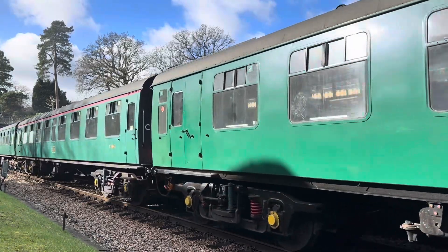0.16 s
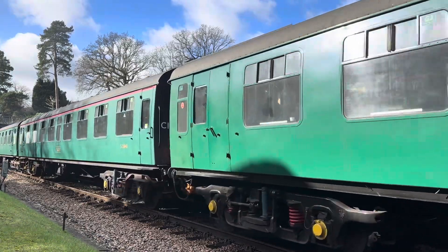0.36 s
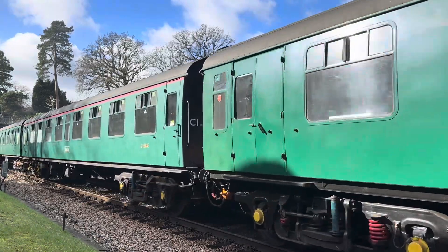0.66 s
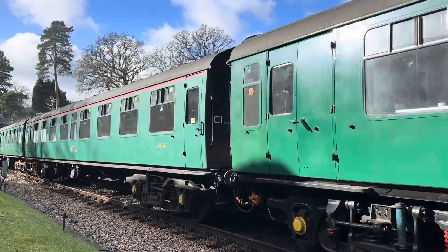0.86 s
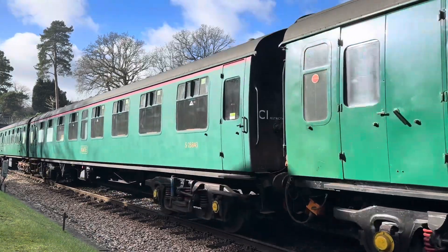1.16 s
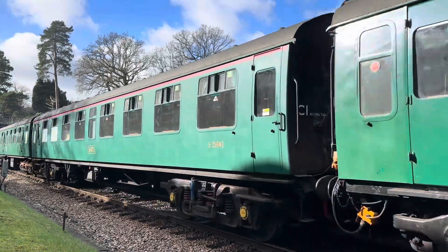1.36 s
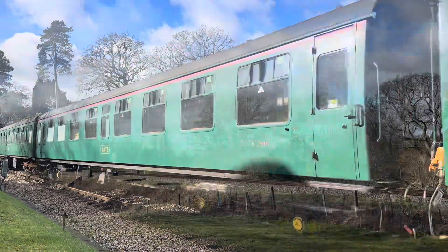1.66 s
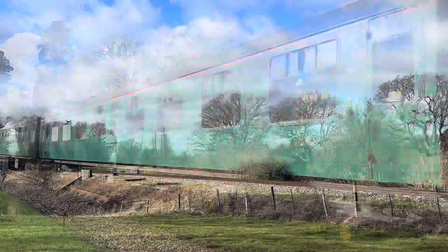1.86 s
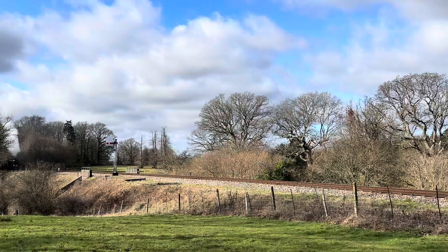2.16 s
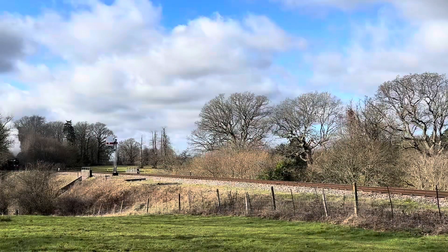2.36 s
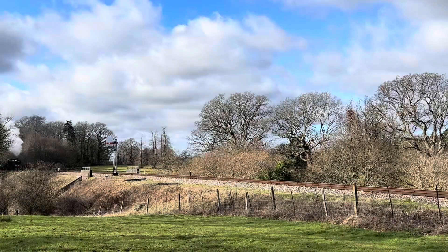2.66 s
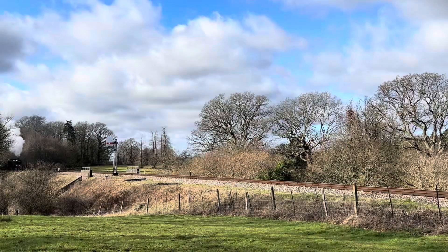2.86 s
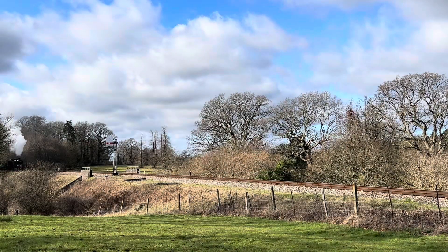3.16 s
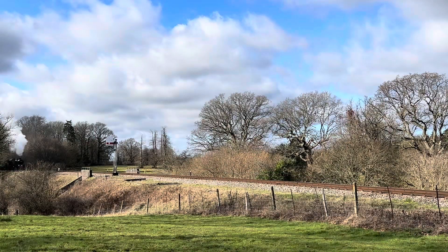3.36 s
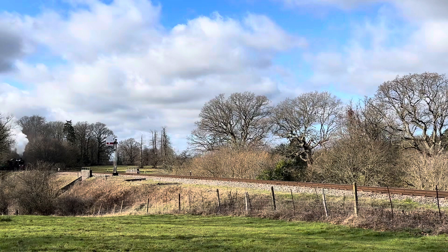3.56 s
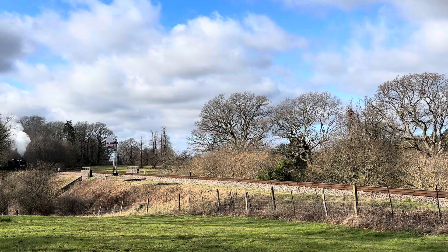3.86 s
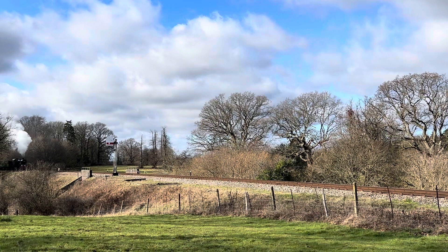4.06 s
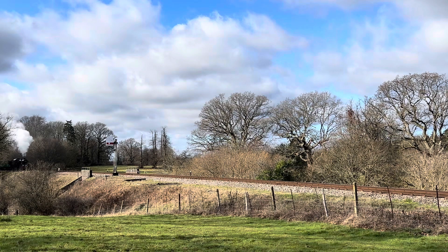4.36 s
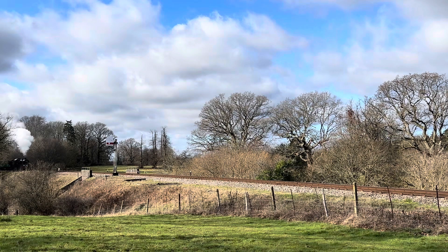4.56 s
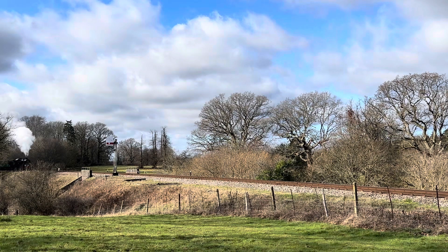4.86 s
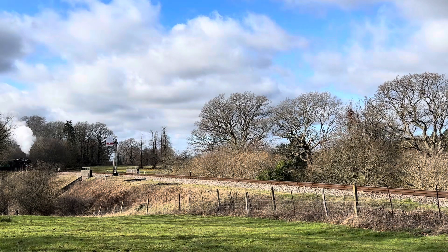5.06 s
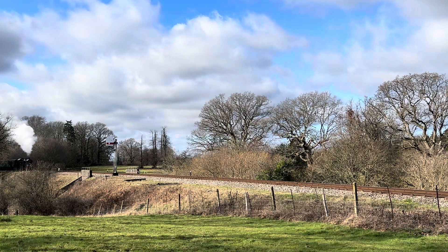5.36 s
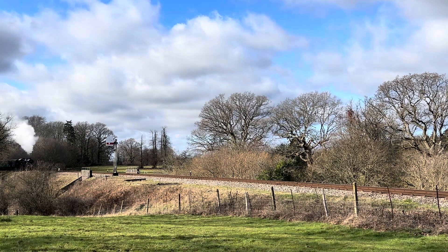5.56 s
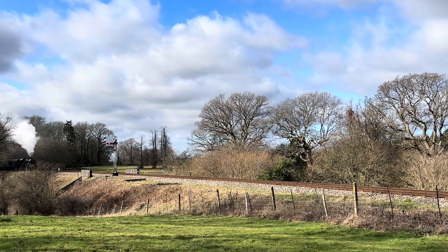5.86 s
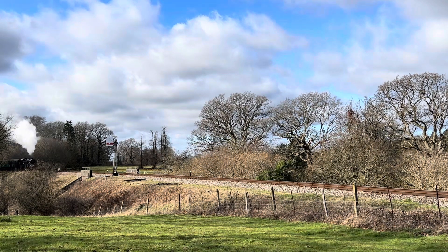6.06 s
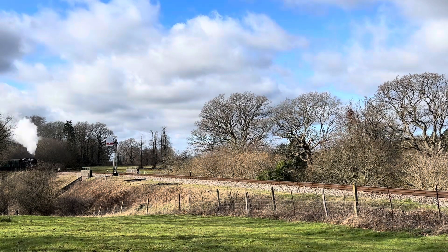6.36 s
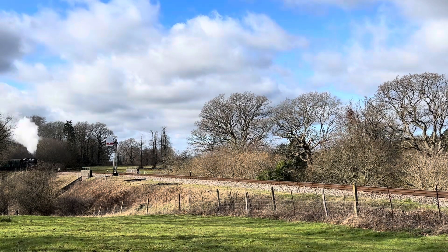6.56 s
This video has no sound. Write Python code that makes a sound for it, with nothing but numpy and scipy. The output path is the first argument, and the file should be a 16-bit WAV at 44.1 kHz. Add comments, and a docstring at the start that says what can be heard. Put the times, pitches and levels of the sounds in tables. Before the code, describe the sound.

Close train carriages roll, clack and hiss, giving way to far-off steam engine chuffs with birdsong and gusts of wind.

```python
"""At first railway coaches roll past close by: rough wheels on rough rail rumble and roar over a hum,
a rubbing wheel hisses and squeals, and wheels clack across a rail joint. From 1.5 s they fade into open
country, leaving the wash of a distant steam locomotive. From 2.2 s its exhaust rasps and booms in the
chimney, about four beats a second and slowly quickening, while small birds whistle in the hedges.
From about 3.5 s gusts of a turbulent breeze buffet the microphone, hardest shortly before 6 s."""
import sys
import numpy as np
from scipy import signal
from scipy.fft import irfft, next_fast_len
from scipy.io import wavfile

SR = 44100
rng = np.random.default_rng(int(sys.argv[2]) if len(sys.argv) > 2 else 0)


def persist_wave(psi):
    """Save psi, clipped to +-1, as 16-bit WAV."""
    counts = np.round(np.clip(psi, -1, 1) * 32767).astype(np.int16)
    wavfile.write(sys.argv[1], SR, np.atleast_2d(counts).T)


N = 295470
T = np.arange(N) / SR
FFT_SIZE = next_fast_len(N, real=True)
HZ = np.maximum(np.arange(FFT_SIZE // 2 + 1) * SR / FFT_SIZE, 1)

# Spectra of the coaches' noises: (frequency [Hz], relative density [dB])
RUMBLE_SPECTRUM = [(20, -37.5), (33, -44), (48, 15), (62, 11.5), (80, 10), (100, 6), (150, -1), (205, 1),
                   (300, 0), (420, -14), (800, -76)]
ROAR_SPECTRUM = [(250, -71), (450, 0.5), (560, 3), (640, 7), (700, 1), (770, 6.5), (880, -1), (1000, 0.5),
                 (1250, -7), (2000, -7)]
RAIL_SPECTRUM = [(800, -4), (1200, 9.5), (1400, 8.5), (1650, 8.5), (2130, 12.5), (2800, 8.5), (4200, 7),
                 (5200, 7), (7500, -4.5), (9300, 4), (11000, -24)]
FLOOR_SPECTRUM = [(110, -16), (160, 6.5), (210, 6.5), (300, -8), (400, -36), (750, -29), (1100, -30)]
CLACK_SPECTRUM = [(60, -4), (200, 3), (320, 17), (480, 18), (850, -3), (1250, 10), (2200, -11), (4000, -21),
                  (10000, -40)]
RUB_SPECTRUM = [(3000, -2.5), (4250, -17.5), (4650, 10), (5500, 8.5), (6250, 9), (6700, 9.5), (7500, 8),
                (8500, 1.5), (11000, -55)]
# Wheels striking the joint, and wheelsets drumming the floor: (time [s], relative level [dB])
JOINT_IMPACTS = [(.255, -34.5), (.551, -34), (.566, -30.5), (.587, -30), (1.139, -32.5), (1.157, -34),
                 (1.174, -32.5)]
WHEELSET_PASSES = [(1.075, -25), (1.17, -32.5), (1.37, -33), (1.57, -26)]
# Modes of a struck wheel and bogie: (frequency [Hz], relative level [dB], 60 dB decay time [s])
STRUCK_MODES = [(400, -0.5, 0.07), (590, -5, 0.049), (776, 1, 0.08), (996, -11, 0.067), (1254, -9, 0.082),
                (1880, -8, 0.031)]
# Squeals of the rubbing wheel: (time [s], frequency [Hz], relative level [dB])
WHEEL_SQUEALS = [(.035, 6760, -36.5), (.105, 5760, -37), (.19, 5900, -42.5), (.325, 5710, -37.5),
                 (.395, 5960, -38.5), (.44, 5250, -41), (.69, 5600, -47), (.805, 5450, -45),
                 (.865, 5880, -46), (.99, 6000, -45.5)]
# Resonances of the rubbing wheel, the smokebox and chimney, and the engine's steady ring:
# (frequency [Hz], half width [Hz], relative level [dB])
RUBBED_MODES = [(5900, 190, -14), (6580, 140, -16), (6970, 220, -9), (7400, 340, -31)]
SMOKEBOX_MODES = [(379, 51, -8), (891, 52, -8), (1094, 76, -12), (1350, 41, -12), (1514, 55, -13),
                  (2070, 730, -22.5)]
ENGINE_MODES = [(840, 185, -19), (1846, 67, -24.5), (3700, 390, -30)]
# Relative strength of the exhaust: (time [s], rasp [dB], bark [dB], boom [dB], boom lag [s])
EXHAUST_STRENGTH = [(2.17, -42, -51.5, -31, .007), (2.45, -42, -48, -33, 0.016),
                    (2.71, -42, -65, -29, .0078), (2.98, -45, -56, -27.5, 0.0044),
                    (3.23, -49, -52, -31.5, 0.022), (3.51, -45.5, -55, -29.5, 0.027),
                    (3.77, -47, -48.5, -31.5, .014), (4.02, -44.5, -51, -40.5, 0.017),
                    (4.27, -45, -47.5, -34, 0.01), (4.54, -44, -52, -33, 0.011),
                    (4.8, -41.5, -49.5, -32.5, 0.0072), (5.05, -43, -50, -34, 0.018),
                    (5.29, -45.5, -44.5, -28.5, .018), (5.55, -43, -49.5, -26, 0.01),
                    (5.81, -43, -53, -30.5, 0.0082), (6.05, -45.5, -55, -27.5, 0.024),
                    (6.28, -48.5, -54, -26, 0.017), (6.55, -43, -46.5, -28, 0.024)]
# Unevenness of the four beats in a turn of the driving wheels: (offset [s])
BEAT_OFFSETS = [-0.0077, 0.0021, 0.0059, 0.0007]
# Spectra of the locomotive's noises: (frequency [Hz], relative density [dB])
RASP_SPECTRUM = [(100, -13), (200, 20), (300, 21), (490, -2.5), (700, 2.5), (900, -8.5), (1450, -11),
                 (2100, -3), (3100, -13), (7000, -20), (9000, -56)]
BARK_SPECTRUM = [(800, -11.5), (1200, 3), (1600, 0), (2100, -4), (2500, -8.5), (3100, -25)]
STEAM_SPECTRUM = [(2000, -24.5), (3400, 17.5), (4800, 17.5), (6800, 19), (8300, -4), (11000, -48)]
WASH_SPECTRUM = [(25, 6), (70, 26.5), (200, 10.5), (330, 3), (520, -8), (700, -7), (870, -7), (1300, -4),
                 (1830, -8), (2300, -12.5), (3100, -18.5), (6900, -21.5), (8500, -35), (15000, -67.5)]
# Steam escaping with some beats, and the course of the engine's wash: (time [s], level [dB])
STEAM_ESCAPES = [(4.03, -63), (4.79, -62), (5.05, -60.5), (5.29, -54.5), (5.545, -58), (6.05, -69)]
WASH_ENVELOPE = [(1.6, -42), (2.0, -41), (6.7, -40)]
# Left-right coherence beside the track and across the fields: (frequency [Hz], correlation [-1 to 1])
NEAR_COHERENCE = [(80, 0.98), (200, .92), (500, 0.57), (750, 0.39), (1100, 0.036), (1500, -0.016),
                  (2000, 0.83), (3300, 0.42), (4800, -0.37), (6000, 0.68), (9000, -0.53), (13000, -0.65)]
FAR_COHERENCE = [(100, 0.93), (400, 0.84), (1150, 0.65), (1550, -0.51), (2000, 0.96), (3100, 0.63),
                 (4500, 1), (9000, 0.15)]
# Lean of the distant sound: (frequency [Hz], left minus right [dB])
FAR_LEAN = [(200, 0), (650, 2.5), (900, 4), (1350, 2.5), (1750, -14.5), (1900, -7.5), (2200, 0),
            (4000, 0.5)]
# Gusts at the microphone: (time [s], half length [s], relative level [dB])
WIND_GUSTS = [(3.628, 0.07, -36.5), (4.015, 0.13, -33), (4.517, 0.3, -40), (4.978, 0.22, -35),
              (5.497, 0.08, -30.5), (5.655, 0.038, -23.5), (5.806, 0.04, -24), (5.957, 0.11, -35),
              (6.45, 0.064, -36.5)]
# Eddies at its ports, the smaller ones higher: (time [s], frequency [Hz], peak level [dB])
PORT_EDDIES = [(1.386, 135, -15.5), (3.809, 138.3, -21.5), (3.871, 144.6, -25.5), (3.948, 131.6, -30.5),
               (4.057, 102, -25.5), (4.111, 86, -28.5), (4.138, 140, -25.5), (4.157, 79.8, -27.5),
               (4.897, 172.2, -25.5), (5.145, 91.7, -22), (5.471, 82.7, -24), (5.495, 78.3, -24),
               (5.529, 85.3, -25), (5.628, 93, -21.5), (5.644, 220.4, -20.5), (5.665, 85.7, -22),
               (5.695, 114.6, -24.5), (5.751, 91, -21), (5.775, 135, -23), (5.799, 158.4, -16.5),
               (5.828, 107.8, -17.5), (5.848, 197.8, -27), (5.904, 182, -27), (6.444, 156.3, -21.5)]
# Spectra of the wind and of crumpling eddies: (frequency [Hz], relative density [dB])
WIND_SPECTRUM = [(18, -41.5), (32, -13), (50, 6.5), (90, 1.5), (140, -6), (220, -13), (400, -37),
                 (900, -74.5)]
CRUMPLE_SPECTRUM = [(150, -1.5), (320, 8), (460, -4.5), (700, -19.5), (1000, -21), (1600, -40)]
# Whistled notes: (time [s], length [s], start [Hz], end [Hz], bend [exponent], relative level [dB])
BIRD_NOTES = [(2.11, 0.049, 8200, 8440, 1.3, -61), (2.19, 0.086, 8230, 8100, 0.68, -60.5),
              (2.32, 0.13, 8500, 8700, 1.6, -71.5), (2.245, 0.074, 5970, 5220, 2.6, -58),
              (2.398, 0.039, 5740, 5300, 0.95, -60), (2.503, 0.019, 4140, 4380, 1.3, -53),
              (2.52, 0.017, 3840, 3630, 1.2, -52), (2.535, 0.043, 4380, 4160, 0.89, -54),
              (2.552, .036, 3950, 3560, 0.5, -49), (2.582, 0.032, 2730, 2540, 1.3, -55),
              (2.59, 0.027, 3920, 3870, 1.1, -55), (2.638, .03, 4400, 5000, 0.95, -53.5),
              (2.64, 0.032, 3550, 2920, 0.96, -61), (2.667, 0.027, 4850, 3680, 0.77, -52),
              (2.74, 0.011, 4360, 5240, 1.5, -47.5), (2.746, 0.0086, 5060, 4580, 1.3, -49),
              (2.748, 0.035, 4150, 3560, 1.6, -48.5), (2.774, 0.016, 4880, 4170, 2.4, -46),
              (2.845, .029, 4260, 4160, 0.97, -48), (2.897, .014, 3600, 3700, 1, -55),
              (2.957, 0.061, 4126, 3970, 1.1, -36), (3.009, 0.013, 3960, 3730, 1, -46),
              (3.021, 0.033, 3240, 3080, 2.9, -51), (3.104, 0.043, 3710, 3630, 1.9, -47),
              (3.143, 0.042, 3610, 3570, 1.2, -48.5), (3.195, 0.016, 3570, 3800, 1, -49.5),
              (3.212, 0.015, 3650, 3200, 1, -52), (3.268, .025, 3680, 3570, 1, -55),
              (3.328, 0.012, 4060, 3700, 1.5, -48.5), (3.347, 0.018, 3350, 3200, 1.5, -56),
              (3.585, 0.037, 4620, 4540, 1, -64), (3.69, .05, 3850, 3700, 1, -59),
              (3.872, 0.018, 5940, 5200, 1.1, -56.5), (3.921, 0.013, 5060, 4880, .8, -51.5),
              (4.165, 0.14, 4150, 4920, 2.8, -53.5), (4.83, 0.12, 5120, 5040, 1, -62),
              (5.13, 0.086, 5180, 4680, 0.72, -52.5), (5.44, 0.033, 8740, 7830, 2.1, -59),
              (6.43, .078, 6250, 5100, 0.82, -62), (6.67, 0.033, 7960, 7700, 1, -60)]
# High hooked chirps: (time of the fall [s], top frequency [Hz], relative level [dB])
HOOKED_CHIRPS = [(4.05, 7150, -61), (4.172, 7120, -54), (4.281, 7230, -51.5)]
# Far twittering birds: (frequency [Hz], relative level [dB], start [s], end [s])
FAR_BIRDS = [(3800, -66, 1.9, 5.6), (5000, -64.5, 4.4, 6.2), (6520, -65.5, 3.9, 6.7)]
# Small ticks nearby: (time [s], level [dB])
NEAR_TICKS = [(3.424, -60), (3.872, -47)]
# Their spectrum: (frequency [Hz], relative density [dB])
TICK_SPECTRUM = [(3000, 0), (5500, 12), (8000, -1), (10000, -5), (14000, -43)]

RUB_LEAN_DB, RUB_LAG_MS = 12, .34  # the rubbing wheel is louder and later on the left
FIRST_BEAT_S, BEAT_GAP_S, QUICKEN_S = 2.179, .26804, .0014  # each gap is QUICKEN_S shorter
FADE_FROM_S, FADE_TO_S = 1.504, 2.082


def coaches():
    """Forced vibration: wheel and rail roughness shakes the bodies and rings the rails; joints jolt."""
    coherence = by_pitch(NEAR_COHERENCE)
    jolts = bursts(JOINT_IMPACTS, rise=.021, decay=.013)
    rumble = passing(db=-22, swell_db=3)
    roar = np.hypot(passing(db=-38, swell_db=6.5), from_db(-5.5) * jolts)
    rail = np.hypot(passing(db=-38, swell_db=-.86), from_db(-11) * jolts)
    out = rumble * noise(colour(RUMBLE_SPECTRUM), coherence, lean_db=.7)
    out += roar * from_db(1.5 * drift(20)) * noise(colour(ROAR_SPECTRUM), coherence, lean_db=-1.5)
    ring_db = colour(RAIL_SPECTRUM)
    ring_db = np.maximum(ring_db, ring_db.max() - 27.5)  # an even sizzle beneath the ring
    out += rail * from_db(.85 * drift(25)) * noise(ring_db, coherence, lean_db=.6)
    drumming = bursts(WHEELSET_PASSES, rise=.082, decay=.053)
    out += drumming * noise(colour(FLOOR_SPECTRUM), coherence, lean_db=2)
    clacks = from_db(-1.5) * bursts(JOINT_IMPACTS, rise=.0033, decay=.014, tail_db=-1, tail=.016)
    return out + clacks * noise(colour(CLACK_SPECTRUM), coherence, lean_db=-.5)


def knocks():
    """Impact excitation: a wheel drops onto the next rail and rings in a random mix of damped modes."""
    out, age = np.zeros(N), T[:SR // 4]
    for s, db in JOINT_IMPACTS:
        for hz, mode_db, t60 in STRUCK_MODES:
            chance = rng.standard_normal()
            amplitude = np.sign(chance) * from_db(db + mode_db + 1.2 * chance)
            add(out, s, amplitude * from_db(-60 * age / t60) * np.sin(2 * np.pi * hz * age))
    return out * pan(-1)


def hum(hz=76.1):
    """Nearly simple harmonic motion: a low tone from the coaches wavers slightly in pitch and level."""
    phase = 2 * np.pi * np.cumsum(hz * (1 + .00016 * drift(4.7))) / SR
    level = passing(db=-20.5, swell_db=-.5) * from_db(.19 * drift(14))
    return level * np.sqrt(2) * np.sin(phase) * pan(.69)


def rubbing(loss_db_per_s=7.5):
    """Sliding friction: steel hisses on steel, and the receding wheel's modes flare up at random."""
    hiss = from_db(1.5 * drift(32)) * noise(colour(RUB_SPECTRUM), .84, RUB_LEAN_DB, RUB_LAG_MS)
    for hz, width_hz, db in RUBBED_MODES:
        flare = unit_rms(from_db(5 * np.tanh(drift(14)) + 1.5 * drift(90)))
        hiss += from_db(db) * flare * noise(resonance(hz, width_hz), 1, RUB_LEAN_DB, RUB_LAG_MS)
    return from_db(-34.5 - loss_db_per_s * T) * hiss


def squeals():
    """Frictional excitation: a wheel mode catches for a moment and rings as a rough, narrow note."""
    out = np.zeros((2, N))
    roughness = drift(205) + 1j * drift(220)
    lag = np.array([[RUB_LAG_MS / 1000], [0]])
    for s, hz, db in WHEEL_SQUEALS:
        near = np.abs(T - s) < .1
        swell = from_db(db) * np.exp(-((T[near] - s) / .039) ** 2)
        carrier = np.exp(2j * np.pi * hz * (T[near] - lag))
        out[:, near] += swell * np.real(roughness[near] * carrier)
    return out * pan(RUB_LEAN_DB)


def passing(db, swell_db, nearest_s=1.85, spread_s=.69):
    """A moving source: the gain swells, or dips, in a bell curve as a pair of bogies goes by."""
    return from_db(db + swell_db * np.exp(-((T - nearest_s) / spread_s) ** 2))


def exhaust():
    """Pulsed flow: each beat is a rasp of steam with a bark at its front and a boom just after."""
    times, rasp_db, bark_db, boom_db, boom_lag = beats()
    out = rasp(zip(times, rasp_db)) + bark(zip(times, bark_db))
    return out + chimney_boom(list(zip(times + boom_lag, boom_db))) + escaping_steam()


def beats(count=18):
    """Four beats to a wheel turn, slowly quickening: their times, three levels and boom lags."""
    k = np.arange(count)
    offset = np.array(BEAT_OFFSETS)[k % len(BEAT_OFFSETS)]
    times = FIRST_BEAT_S + k * BEAT_GAP_S - QUICKEN_S * k * (k - 1) / 2 + offset
    when, *columns = np.transpose(EXHAUST_STRENGTH)
    return [times] + [np.interp(times, when, column) for column in columns]


def rasp(pulses):
    """Jet noise: steam excites the resonances of smokebox and chimney; woods scatter a tail."""
    jet = from_db(1) * distant_noise(colour(RASP_SPECTRUM))
    for hz, width_hz, db in SMOKEBOX_MODES:  # moving air colours every beat differently
        jet += from_db(db + 2 * drift(4.6)) * distant_noise(resonance(hz, width_hz))
    envelope = bursts(pulses, rise=.012, decay=.021, tail_db=-3.5, tail=.043, delay=-.0047)
    return envelope * from_db(2 + drift(57)) * reflected(jet)


def reflected(direct, lag_ms=4.69, shift_ms_per_s=.05, share=.45):
    """Interference: a close reflection makes a comb filter that slides as the engine moves."""
    lag = (lag_ms + shift_ms_per_s * (T - FIRST_BEAT_S)) / 1000
    echo = np.array([np.interp(T - lag, T, side) for side in direct])
    return (direct + share * echo) / np.hypot(1, share)


def bark(pulses):
    """Amplitude-modulated noise: the throat of the blast pipe barks raggedly on a hard beat."""
    ragged = unit_rms(from_db(2 * drift(160)) * distant_noise(colour(BARK_SPECTRUM)))
    return bursts(pulses, rise=.011, decay=.032, delay=-.009) * ragged


def chimney_boom(pulses, hz=202.5, waver_hz=12.98):
    """Air-column resonance: the chimney sounds a wavering note, trailed by its scattered ring."""
    column = np.sqrt(2) * np.sin(2 * np.pi * np.cumsum(hz + waver_hz * drift(25.75)) / SR)
    direct = bursts(pulses, rise=.013, decay=.017) * column * pan(.5)
    scattered = from_db(-11) * noise(resonance(hz, width_hz=29), .89)
    return direct + bursts(pulses, rise=.022, decay=.022, tail_db=-2, tail=.1) * scattered


def escaping_steam():
    """Jet noise: puffs of steam hiss with some of the beats."""
    puffs = bursts(STEAM_ESCAPES, rise=.02, decay=.0037, tail_db=-2.5, tail=.059)
    return puffs * noise(colour(STEAM_SPECTRUM), 1)


def engine_wash():
    """Broadband noise with resonances: the distant train's steady wash and ring, heard throughout."""
    wash = distant_noise(colour(WASH_SPECTRUM))
    for hz, width_hz, db in ENGINE_MODES:
        wash += from_db(db + 1.65 * drift(8.5)) * distant_noise(resonance(hz, width_hz))
    level_db = np.interp(T, *np.transpose(WASH_ENVELOPE))
    return from_db(level_db + .23 * drift(17)) * wash


def breeze(calm):
    """Turbulent pressure at the microphone's ports comes in gusts; sharp eddies add a higher crumple."""
    gust_power = sum(from_db(db) ** 2 * np.exp(-((T - s) / half) ** 2) for s, half, db in WIND_GUSTS)
    flow = np.sqrt(calm ** 2 + gust_power)
    lumps, sharpness = eddies()
    crumple = from_db(-27) * sharpness ** 1.54 * evened(noise(colour(CRUMPLE_SPECTRUM), .85))
    buffeting = flow * from_db(1) * evened(noise(colour(WIND_SPECTRUM), .56))
    return buffeting + lumps + crumple


def eddies(half_length_cycles=1.09, sag_octaves_per_s=18, lean_db=8):
    """Pressure oscillation: each slowing eddy pushes and pulls briefly. Gives sound and sharpness."""
    lumps, sharpness = np.zeros((2, N)), np.zeros(N)
    for s, hz, db in PORT_EDDIES:
        half_turns, side = rng.uniform(-1.15, 1, 2)
        near = np.abs(T - s) < .06
        age = T[near] - s
        swell = from_db(db) * np.exp(-(age * hz / half_length_cycles) ** 2)
        cycles = np.cumsum(hz * 2 ** (-sag_octaves_per_s * age)) / SR
        lumps[:, near] += swell * np.sin(2 * np.pi * cycles + np.pi * half_turns) * pan(lean_db * side)
        sharpness[near] += swell * hz
    return lumps, sharpness / sharpness.max()


def birds(near_db=-45):
    """Direct and scattered sound: the hedge blurs far notes most, and the wood trails them all."""
    to_trees, direct = np.zeros((2, N))
    for s, length, start_hz, end_hz, bend, db in list(BIRD_NOTES) + chirp_notes():
        octaves_per_s = abs(np.log2(end_hz / start_hz)) / length
        far = np.clip((near_db - db) / 10, 0, 1)  # the faintest birds are the farthest
        quaver = min(.002 + .002 * octaves_per_s + .011 * far, .026)  # fast sweeps are raspy
        note = from_db(db) * whistle(length, start_hz, end_hz, bend, quaver)
        add(direct, s, (1 - far / 2) * note)
        add(to_trees, s, (1 + 3 * far) / 4 * note)
    hedge = from_db(-6) * trees(to_trees, t60=.13)
    wood = from_db(-6.5) * trees(to_trees, t60=.45)
    return direct * from_db(1.2 * drift(70)) + hedge + wood


def chirp_notes(flick_lead_s=.026, flick_s=.009, fall_s=.049):
    """Frequency sweeps: each hooked chirp is two notes, an upward flick and an arching fall."""
    notes = []
    for s, top_hz, db in HOOKED_CHIRPS:
        low_hz = .8 * top_hz
        notes.append((s - flick_lead_s, flick_s, low_hz, top_hz, 1, db - 1.5))
        notes.append((s, fall_s, top_hz, low_hz, .6, db))
    return notes


def whistle(length, start_hz, end_hz, bend, quaver):
    """Frequency modulation: a quavering note glides early if bend is above 1, late if below."""
    progress = np.linspace(0, 1, int(length * SR))
    hz = end_hz + (start_hz - end_hz) * (1 - progress) ** bend
    hz *= 1 + quaver * np.interp(progress, np.linspace(0, 1, 40), rng.standard_normal(40))
    return np.sqrt(np.abs(np.sin(np.pi * progress))) * np.sin(2 * np.pi * np.cumsum(hz) / SR)


def chorus(notes_per_bird=32):
    """Reverberant sound: far birds twitter in short random slides, and only their scatter arrives."""
    song = np.zeros(N)
    for hz, db, first, last in FAR_BIRDS:
        for when, size, height, *slide in rng.random((notes_per_bird, 5)):
            start_hz, end_hz = hz * (1 + .16 * (height + np.array(slide) - 1))
            note = whistle(.02 + .05 * size, start_hz, end_hz, bend=1, quaver=.025)
            add(song, first + when * (last - first), from_db(db) * note)
    return from_db(-1.5) * trees(song, t60=.25)


def trees(x, t60):
    """Multiple scattering: trunks and twigs give a dying tail, nearly alike on both sides."""
    mid, side = rng.standard_normal((2, SR)) * from_db(-60 * T[:SR] / t60)
    response = (mid + .28 * side * [[1], [-1]]) / np.sqrt(np.sum(mid ** 2))
    return signal.fftconvolve(x[None], response, axes=1)[:, :N]


def ticks():
    """Broadband transients: tiny dry clicks nearby."""
    envelope = bursts(NEAR_TICKS, rise=.0014, decay=.0008, tail_db=-18, tail=.01)
    return envelope * noise(colour(TICK_SPECTRUM), .9)


def bursts(rows, rise, decay, tail_db=-60, tail=.1, delay=0):
    """Incoherent addition: envelope of bursts that swell, die and leave a tail; times in seconds."""
    power = np.zeros(N)
    for s, db in rows:
        near = slice(*np.searchsorted(T, [s - .15, s + .9]))
        age = T[near] - s - delay
        before, after = np.minimum(age, 0), np.maximum(age, 0)
        swell = np.exp(-np.minimum((before / rise) ** 2, 50))
        dying = np.exp(-np.minimum((after / decay) ** 2, 50))
        scattered = from_db(tail_db) ** 2 * np.exp(-after / tail)
        power[near] += from_db(db) ** 2 * swell * (dying + scattered)
    return np.sqrt(power)


def noise(colour_db, coherence, lean_db=0, lag_ms=0):
    """Partial coherence: mid and side noises mix to stereo of unit rms; the left may lag."""
    white = rng.standard_normal((2, 2 * len(HZ)), dtype=np.float32).view(np.complex64)
    mid, side = white * from_db(colour_db).astype(np.float32)
    coherence = np.clip(coherence, -.999, .999)
    mid, side = np.sqrt(1 + coherence) * mid, np.sqrt(1 - coherence) * side
    spectra = np.array([mid + side, mid - side]) * pan(lean_db)
    left, right = irfft(spectra.astype(np.complex64), FFT_SIZE)[:, :N]
    return unit_rms(np.array([np.roll(left, round(lag_ms * SR / 1000)), right], float))


def distant_noise(colour_db):
    """Noise with the coherence and lean of sound from across the fields."""
    return noise(colour_db, by_pitch(FAR_COHERENCE), by_pitch(FAR_LEAN))


def evened(x):
    """Compression: dividing by the envelope removes most of a noise's swings of level."""
    envelope = np.abs(signal.hilbert(x.astype(np.float32), FFT_SIZE)[:, :N]).mean(0)
    return unit_rms(x / (envelope + .35))


def drift(rate_hz, step=40):
    """Random modulation of unit spread: noise through a two-pole low-pass."""
    pole = np.exp(-2 * np.pi * rate_hz * step / SR)
    count = N // step
    slow = signal.lfilter([1], [1, -2 * pole, pole * pole], rng.standard_normal(2 * count))[count:]
    return np.interp(np.arange(N) / step, np.arange(count), unit_rms(slow))


def resonance(hz, width_hz):
    """Response in dB of a steep-sided resonance."""
    return -20 * np.log10(1 + ((HZ - hz) / width_hz) ** 2)


def colour(points):
    """Band-limited spectrum in dB, falling 20 dB an octave beyond its end points."""
    octaves_beyond = np.log2(np.maximum(1, np.maximum(HZ / points[-1][0], points[0][0] / HZ)))
    return by_pitch(points) - 20 * octaves_beyond


def by_pitch(points):
    """Linear interpolation over log frequency."""
    hz, values = np.transpose(points)
    return np.interp(np.log(HZ), np.log(hz), values)


def pan(lean_db):
    """Left and right gains for a level difference."""
    return from_db(np.array([[.5], [-.5]]) * lean_db)


def add(track, s, sound):
    """Superposition: add a sound to a track at s seconds."""
    part = track[int(s * SR):][:len(sound)]
    part += sound[:len(part)]


def from_db(db):
    """Decibels to amplitude ratio."""
    return np.exp(np.asarray(db) * (np.log(10) / 20))


def unit_rms(x):
    """Normalisation to unit power."""
    return x / np.sqrt(np.mean(x ** 2) + 1e-20)


def scene():
    """Superposition: the coaches fade out, unmasking the engine in the fields, as light air fades in."""
    fade = np.clip((FADE_TO_S - T) / (FADE_TO_S - FADE_FROM_S), 0, 1)
    train = coaches() + knocks() + hum() + rubbing() + squeals()
    fields = engine_wash() + exhaust() + birds() + chorus() + ticks()
    return fade * train + fields + breeze(calm=from_db(-53) * (1 - fade))


def record(dry):
    """Band limiting: a steep low-pass stops the treble above 16.4 kHz."""
    return signal.sosfilt(signal.cheby2(14, 70, 16400, fs=SR, output="sos"), dry)


dry = scene()
out = record(dry)
persist_wave(out)
```